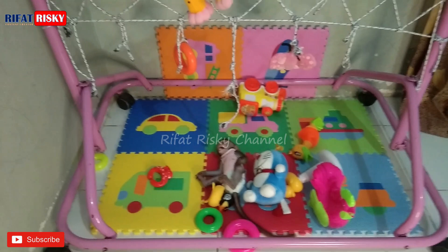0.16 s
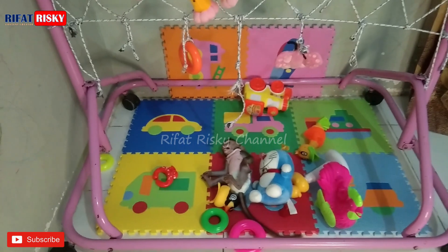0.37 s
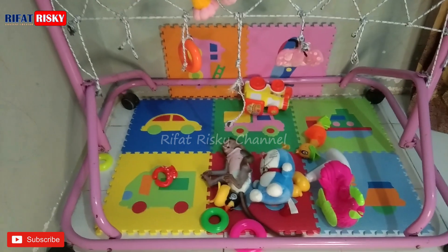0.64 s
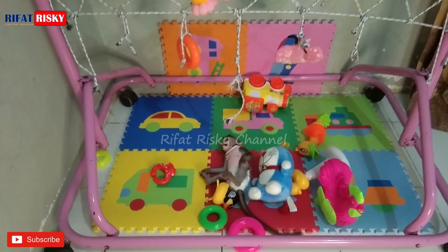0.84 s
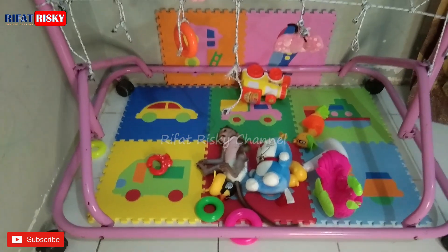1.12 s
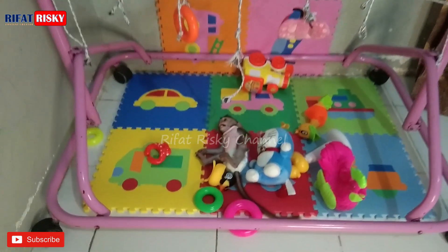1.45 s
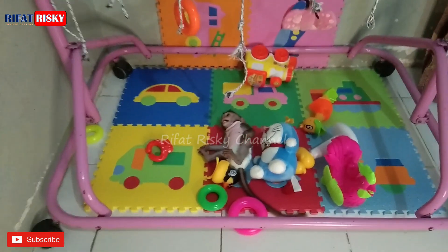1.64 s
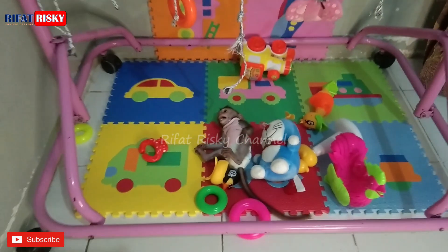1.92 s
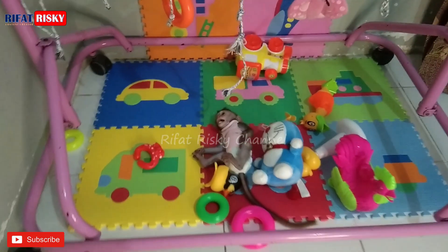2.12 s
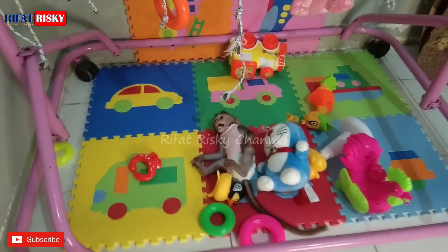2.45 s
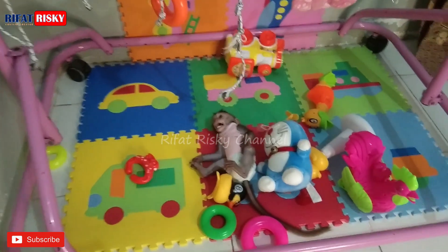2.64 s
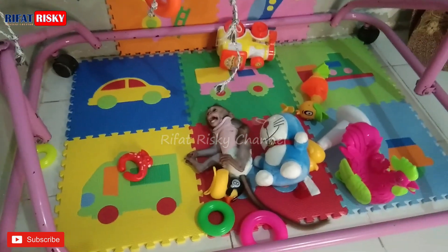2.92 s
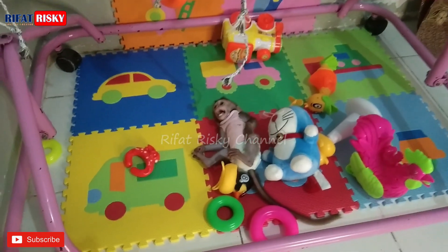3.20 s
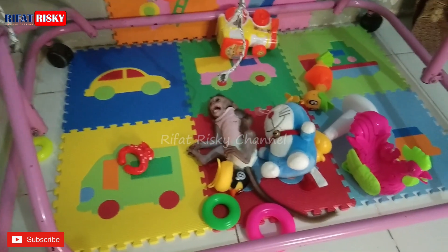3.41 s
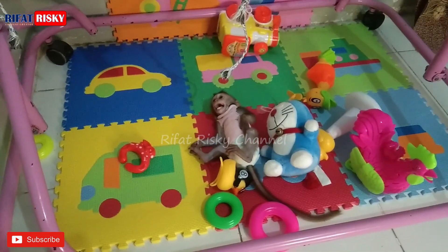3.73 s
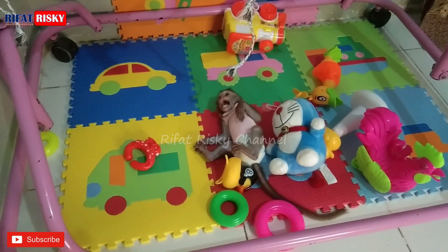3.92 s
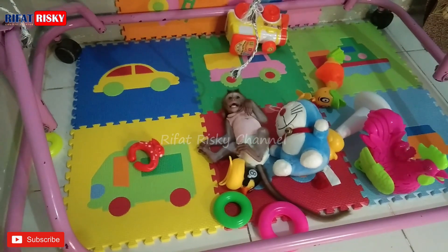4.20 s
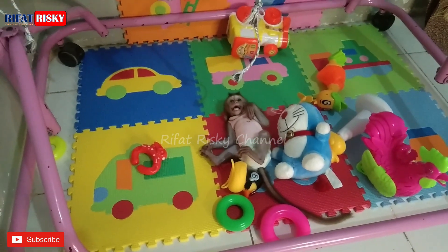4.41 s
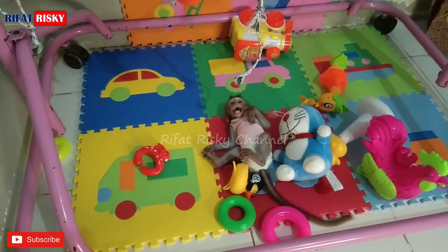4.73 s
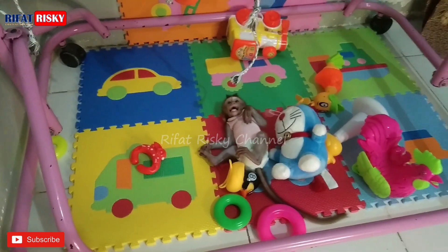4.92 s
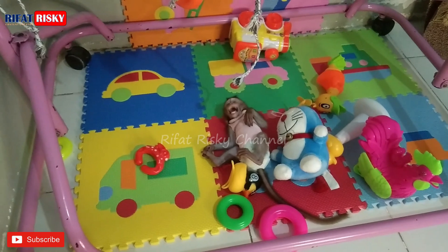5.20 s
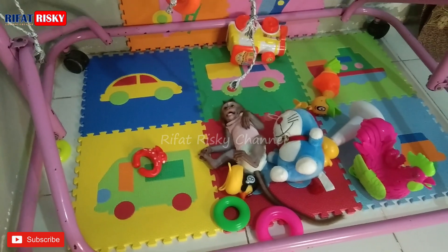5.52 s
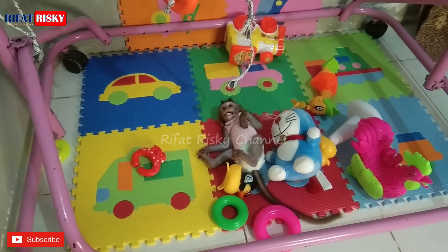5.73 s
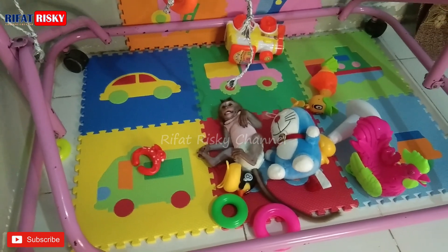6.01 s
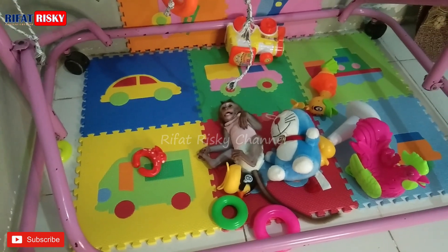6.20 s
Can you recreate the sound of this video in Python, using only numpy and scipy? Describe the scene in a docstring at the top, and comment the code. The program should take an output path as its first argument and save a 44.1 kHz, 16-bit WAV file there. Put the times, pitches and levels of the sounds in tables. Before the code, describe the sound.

A low, slightly beating motor hum and a soft rush of air run throughout in a reflective tiled room. At about 0.1 s a baby monkey gives one short shrill cry, a held note stepping up and breaking roughly, over by 0.27 s. Soft husky squeaks appear near 0.7, 1.2, 1.4, 1.7 and 1.9 s, with faint toy nudges on a foam mat at 1.2 and 1.7 s. Six very loud calls start at about 2.3, 2.7, 3.2, 3.7, 4.4 and 5.0 s. Each begins as a clear squeal whipping upward and thinning, then bursts into a harsh, fluttering, falling scream, with some broken into several pieces; faint low whines fall between and around them. The microphone's level ducks under the screams and slowly recovers. Screaming stops near 5.25 s. A faint rustle comes at 5.7 s, with click-and-thud toy bumps at 5.8 and 6.2 s.

```python
"""Throughout, motor lines beat over a rush of air in a tiled room. A baby monkey gives one shrill cry.
Soft squeaks and nudged toys follow: unsteady tones, and decaying noise bursts.
Then come six calls: harmonics sweep up in a clear squeal and thin out, then a stack of lines
one flutter rate apart falls as a harsh scream, and the recorder's gain ducks under the loud sounds.
A faint rustle and two more nudged toys close the scene."""
import sys
import numpy as np
from scipy import signal
from scipy.fft import rfft, irfft, next_fast_len
from scipy.io import wavfile
from scipy.ndimage import uniform_filter1d, minimum_filter1d, map_coordinates

SR = 44100
rng = np.random.default_rng(int(sys.argv[2]) if len(sys.argv) > 2 else 0)


def output_pcm(signal):
    """Save a mono or channel-first signal as 16-bit PCM at the path in sys.argv[1].

    Samples are clipped to [-1, 1] before scaling.
    """
    pcm = np.clip(np.atleast_2d(signal).T, -1, 1) * 32767
    wavfile.write(sys.argv[1], SR, np.round(pcm).astype(np.int16))


N = 280035
TIME = np.arange(N) / SR  # s
TOP_HZ = 15700


def amp(db):
    """Logarithmic level: decibels to an amplitude ratio."""
    return 10 ** (np.asarray(db) / 20)


def unit(x):
    """Power normalization: scales a signal to rms 1."""
    return x / np.sqrt(np.mean(x ** 2) + 1e-20)


def along(points, hz):
    """Spectral envelope: (f/Hz, value) points interpolated on a logarithmic frequency axis."""
    f, value = np.transpose(points)
    return np.interp(np.log(hz + 1), np.log(f + 1), value)


def curves(rows, t):
    """Temporal envelopes: each column after the time, interpolated at the times t."""
    knot_times, *columns = np.transpose(rows)
    return [np.interp(t, knot_times, column) for column in columns]


def wobble(rate, t):
    """Band-limited random modulation: a smooth curve through `rate` random knots a second."""
    knots = (t - t[0]) * rate
    return map_coordinates(rng.standard_normal(int(knots[-1]) + 4), [knots + 1])


def filtered(x, gain):
    """Linear filtering: the spectrum of x times a gain that depends on frequency."""
    m = next_fast_len(N + 8192)
    return irfft(rfft(x, m) * gain(np.fft.rfftfreq(m, 1 / SR)), m)[:N]


def noise(spectrum):
    """Coloured noise: white noise shaped by a spectral envelope, scaled to rms 1."""
    return unit(filtered(rng.standard_normal(N), lambda hz: amp(along(spectrum, hz))))


def cycles(hz):
    """Instantaneous phase: the running integral of a frequency curve, in radians."""
    return 2 * np.pi * np.cumsum(hz) / SR


def voiced(start, end, edge=.003):
    """Gating: sample indices, times and a soft-edged window (edge in s) for one utterance."""
    at = np.arange(int((start - edge / 2) * SR), int((end + edge / 2) * SR))
    t = at / SR
    return at, t, np.clip(np.minimum(t - t[0], t[-1] - t) / edge, 0, 1)


# motor lines, of which close pairs beat: (f/Hz, relative level/dB)
MOTOR_LINES = [(145, -67.5), (187, -62.5), (191, -56.5), (312, -64), (375.6, -55.5), (379, -76),
               (610, -58.5), (682, -61), (781, -60)]
# spectrum of the rush of air: (f/Hz, relative density/dB)
AIR_SPECTRUM = [(15, -59), (25, -28), (64, -19.5), (149, -10), (184, -6.5), (274, -9.5), (300, -8.5),
                (371, -5), (458, -7.5), (863, -7.5), (971, -11.5), (2480, -14.5), (3530, -24.5),
                (6340, -20.5), (6800, -27), (8840, -66.5), (15000, -120)]
# slow drift, of which only the departure from the mean counts: (t/s, hum level/dB, air level/dB)
BACKGROUND_DRIFT = [(0.0, -57, -47), (1.98, -56, -47), (2.88, -58, -43.5), (3.64, -61.5, -51),
                    (3.86, -59, -44.5), (5.04, -63.5, -46.5), (5.27, -64.5, -50.5), (6.07, -58, -48),
                    (6.35, -69, -43.5)]


def background(hum_db=-52.0, air_db=-44.0, waver_db=4.0, drift=0.87):
    """Beating: neighbouring motor lines interfere, each wavering, over a drifting broadband rush of air."""
    hum_level, air_level = (level - level.mean() for level in curves(BACKGROUND_DRIFT, TIME))
    hum = np.zeros(N)
    for hz, db in MOTOR_LINES:
        strength = amp(db + waver_db * wobble(4.5, TIME))
        hum += strength * np.sin(2 * np.pi * hz * TIME + drift * wobble(6, TIME))
    return amp(hum_db + hum_level) * unit(hum) + amp(air_db + air_level) * noise(AIR_SPECTRUM)


# reverberation time of the tiled room: (f/Hz, t60/s)
REVERBERATION = [(300, 0.22), (2000, 0.95), (4500, 0.64), (7000, 0.67), (14000, 0.85)]


def room(x, gap=.002, early_db=2, early_t60=0.039):
    """Reverberation: quick dense echoes off floor and near walls, then a ring whose decay varies with f."""
    hz, t, z = signal.stft(rng.standard_normal(SR), SR, nperseg=256)
    fade = amp(-60 * t / along(REVERBERATION, hz)[:, None]) + amp(early_db - 60 * t / early_t60)
    tail = signal.istft(z * fade, SR, nperseg=256)[1]
    tail = np.pad(tail / np.linalg.norm(tail), (int(gap * SR), 0))  # unit energy, after a gap in s
    return signal.fftconvolve(x, tail)[:N]


# toys nudged: (t/s, relative level/dB, further level of the thud/dB)
NUDGES = [(1.225, -43.5, -4), (1.7, -42.5, -19), (5.771, -37.5, -4.5), (6.232, -33, -2.5)]
# spectrum of the contact: (f/Hz, relative density/dB)
TAP_SPECTRUM = [(500, -12), (1300, 17.5), (3000, 6), (5500, 18), (12000, -21)]
# spectrum of the dull thud: (f/Hz, relative density/dB)
THUD_SPECTRUM = [(120, -63), (350, 18), (700, 4.5), (1500, -27)]


def bumps(t60=0.67, tap_db=-8, thud_db=-8, click_db=3, click_t60=0.052):
    """Impact decay: toys nudged on a foam mat give click and scuff over a thud, fading at two rates (s)."""
    out, tap, thud = np.zeros(N), noise(TAP_SPECTRUM), noise(THUD_SPECTRUM)
    for start, db, low_db in NUDGES:
        age = abs(TIME - start)
        decay = amp(-60 * age / t60) + amp(click_db - 60 * age / click_t60)
        fade = (TIME >= start) * amp(db) * decay
        out += fade * (amp(tap_db) * tap + amp(thud_db + low_db) * thud)
    return out


# faint low whines: (t/s, length/s, first f/Hz, last f/Hz, relative level/dB)
LOW_WHINES = [(2.76, 0.14, 850, 788, -45.5), (3.31, 0.064, 900, 796, -48.5),
              (3.717, 0.059, 1330, 1340, -44), (3.85, .2, 898, 656, -44), (4.58, .09, 847, 732, -44),
              (5.1, 0.1, 828, 765, -44.5)]
# soft squeaks, and a faint rustle at the end: (t/s, length/s, mean f/Hz, relative level/dB, roughness from 0 up)
SQUEAKS_AND_RUSTLE = [(0.678, 0.15, 4450, -50, 0.83), (1.226, 0.095, 5290, -51.5, 0.24),
                      (1.398, 0.052, 4450, -48, 0.74), (1.7, .04, 5300, -57, 0.55),
                      (1.882, 0.073, 4520, -44, 1.04), (2.322, 0.032, 4300, -24.5, 0.88),
                      (5.72, 0.087, 2447, -51, 1.26)]
# spectrum of husky noise, also used in the squeals: (f/Hz, relative density/dB)
RASP_SPECTRUM = [(200, -70), (1200, -21.5), (2900, -14.5), (4000, -13), (6500, -16.5), (10000, -15.5),
                 (15000, -25)]


def whimpers(whine_jitter=0.06, squeak_jitter=0.0824, rasp_db=-4):
    """Random frequency modulation: unsteady low whines, and squeaks and a rustle, husky with noise."""
    out, rasp = np.zeros(N), noise(RASP_SPECTRUM)
    for start, length, first_hz, last_hz, db in LOW_WHINES:
        at, t, gate = voiced(start, start + length, edge=0.015)
        pitch = np.linspace(first_hz, last_hz, len(t))
        tone = np.sqrt(2) * np.sin(cycles(pitch * (1 + whine_jitter * wobble(250, t))))
        out[at] += gate * amp(db) * tone
    for start, length, pitch, db, rough in SQUEAKS_AND_RUSTLE:
        at, t, gate = voiced(start, start + length, edge=0.024)
        tone = np.sqrt(2) * np.sin(cycles(pitch * (1 + squeak_jitter * rough * wobble(1400, t))))
        out[at] += gate * amp(db) * (tone + amp(rasp_db) * rough * rasp[at])
    return out


# opening cry, a held note that steps up into a rough arch: (t/s, f/Hz, relative level/dB, roughness)
OPENING_CRY = [(.111, 1802, -24.5, .15), (0.125, 2030, -21, 0.01), (.178, 2040, -32, 0.14),
               (.192, 2162, -16, 0), (.207, 2135, -34, 0.13), (.219, 2230, -19.5, 0.26),
               (.228, 3000, -18.5, 0.21), (.24, 2727, -15, 0.1), (.25, 2217, -14.5, 0.22),
               (.264, 1697, -22.5, 0.75)]
# rising squeals: (t/s, hold/s, sweep/s, thin tail/s, held f/Hz, top f/Hz, last f/Hz,
# relative held level/dB, relative top level/dB, roughness, weight of the fundamental at the top/dB)
RISING_SQUEALS = [ (2.331, 0.017, .012, 0.012, 1964, 4200, 5300, -23.5, -19.5, .35, -1),
                  (2.703, .012, .028, 0.061, 2297, 5680, 6800, -22, -16.5, 0.07, -8),
                  (3.201, .022, .019, 0.06, 2241, 4546, 5140, -20.5, -14, 0.27, -2),
                  (3.733, 0.02, .032, 0.0034, 2198, 5820, 6530, -24, -13, 0.18, -1),
                  (4.41, .044, .015, .034, 1979, 3520, 3675, -25, -14.5, 0.17, 5),
                  (5.003, 0.03, .016, 0.067, 2227, 3575, 7460, -25, -14, 0.2, -4)]


def squeal_shapes():
    """Glissando: the cry, then squeals that scoop to a note, hold, sweep up as they swell, and thin out."""
    held_fundamental_db = -4.5  # weight of the fundamental while a note is held
    scoop_depth, scoop_s = 0.215, 0.00854  # share below the note at the start, time constant of the slide
    sweep_curve = 1.8  # the upward sweep speeds up with this power of time
    # past the top the level drops over thin_s, fades on along the tail, and roughness nears thin_rough
    thin_db, thin_s, fade_db, thin_rough = 11.5, 0.011, 5, .7
    at, t, gate = voiced(OPENING_CRY[0][0], OPENING_CRY[-1][0])
    yield at, t, gate, *curves(OPENING_CRY, t), held_fundamental_db
    for (start, hold, sweep, tail, held_hz, top_hz, last_hz,
         held_db, top_db, rough, full_db) in RISING_SQUEALS:
        top = start + hold + sweep
        at, t, gate = voiced(start, top + tail)
        scoop = 1 - scoop_depth * np.exp(-(t - start) / scoop_s)
        climb = np.clip((t - start - hold) / sweep, 0, 1) ** sweep_curve
        thin = np.clip((t - top) / thin_s, 0, 1)
        fade = np.clip((t - top) / tail, 0, 1)
        pitch = held_hz * scoop * (top_hz / held_hz) ** climb * (last_hz / top_hz) ** np.sqrt(fade)
        db = held_db + (top_db - held_db) * climb - thin_db * thin - fade_db * fade
        roughness = rough + (thin_rough - rough) * thin
        fundamental_db = held_fundamental_db * (1 - climb) + full_db * climb
        yield at, t, gate, pitch, db, roughness, fundamental_db


# pass band of the throat, shared by squeals and screams: (f/Hz, relative gain/dB)
THROAT_BAND = [(1500, -21), (2100, -10), (2900, -11), (3600, -5.5), (4400, 2), (5300, 3.5), (6300, 0),
               (7100, -4), (10000, -10.5), (15000, -18.5)]


def squeals(jitter=0.07, shimmer_db=6, slope_db=-2, rasp_db=-10, doubling_db=-10, flicker_db=4.0):
    """Source and filter: harmonics sweep through the throat's pass band; roughness doubles the period."""
    out, rasp = np.zeros(N), noise(RASP_SPECTRUM)
    k = np.arange(2, 17)[:, None] / 2  # harmonic numbers 1 to 8 in half steps
    for at, t, gate, pitch, db, rough, full_db in squeal_shapes():
        pitch = pitch * (1 + jitter * rough * wobble(900, t) + 0.0063 * wobble(149.4, t))
        size_db = along(THROAT_BAND, k * pitch) + slope_db * np.log2(k) + full_db * (k == 1)
        size = amp(size_db) * (k * pitch < TOP_HZ)
        size = size * np.where(k % 1, amp(doubling_db) * rough, 1)  # lines halfway between harmonics
        flicker = amp(flicker_db * np.array([wobble(161.7, t) for _ in k]))
        tone = (size * flicker * np.sin(k * cycles(pitch))).sum(0)
        tone = tone / np.sqrt((size ** 2).sum(0) / 2)
        level = amp(db + shimmer_db * rough * wobble(504.4, t))
        out[at] += gate * level * (tone + amp(rasp_db) * rough * rasp[at])
    return out


# falling screams: (t/s, rise/s, sag/s, first f/Hz, last f/Hz, power of time of the fall,
# relative peak level/dB, sag/dB, first roughness, torn roughness, flutter rate over pitch)
FALLING_SCREAMS = [ (2.397, .021, .022, 5600, 2655, 1.44, -6.5, 6.5, 0.3, 0.71, 0.21),
                   (2.854, 0.0071, 0.05, 4470, 4410, 1.07, -25, 4, 0.4, 0.65, 0.19),
                   (2.905, 0.024, .032, 4048, 3024, 1.2, -8.5, 10.5, 0.57, 0.8, .21),
                   (3.357, .016, .070, 4380, 2495, 1.35, -8, 14.5, .6, 1.07, .2),
                   (3.921, 0.025, 0.0168, 4626, 4156, 1.2, -7, 12, .25, 0.81, .2),
                   (3.962, 0.012, 0.046, 3930, 3826, 0.97, -20, 1, .6, 0.32, .2),
                   (4.049, .004, 0.0181, 3880, 3150, 1.085, -10.5, 15, 0.53, 1.2, .2),
                   (4.523, 0.0064, 0.0485, 4470, 4394, 1.1, -11, 12.5, 1.04, 1, .2),
                   (4.663, 0.022, .046, 4493, 3040, 1.3, -9.5, 8.5, 0.65, .9, .2),
                   (5.139, 0.03, .082, 4458, 3300, 2.2, -11.5, 6.5, 0.32, 0.97, 0.18)]


def scream_shapes():
    """Envelope and glide: each scream swells and sags as its pitch falls and its roughness shifts."""
    rise_db = 18  # swell of a smooth start to its peak
    rough_start_db = 15.5  # a start of roughness 1 is this much louder, and so more abrupt
    tear_s = 0.049  # time until the torn roughness is reached
    for (start, rise, sag, first_hz, last_hz, bend, peak_db, sag_db,
         first_rough, torn_rough, flutter_ratio) in FALLING_SCREAMS:
        at, t, gate = voiced(start, start + rise + sag)
        age = np.maximum(t - start, 0)
        pitch = first_hz + (last_hz - first_hz) * (age / (rise + sag)) ** bend
        start_drop_db = rise_db - rough_start_db * first_rough
        db = peak_db - np.interp(age, [0, rise, rise + sag], [start_drop_db, 0, sag_db])
        roughness = np.interp(age, [0, tear_s], [first_rough, torn_rough])
        yield at, t, gate, pitch, db, roughness, flutter_ratio


# lines of a scream, from its pitch upwards, one flutter rate apart: relative level/dB
FLUTTER_LINES = [-0.5, 1, 0, 0, -2.5, -3, -12.5]
# spectrum of the turbulence that rides on the pitch: (f above the pitch/Hz, relative density/dB)
TURBULENCE_SPECTRUM = [(60, -38), (500, 12.5), (2500, -3), (3600, -20), (7000, -9), (9000, -42)]
# spectrum of the broad rush under a scream: (f/Hz, relative density/dB)
SKIRT_SPECTRUM = [(200, -56), (800, -18), (1600, -10), (2400, -11), (3200, -2), (4500, -8.5), (7000, 4.5),
                  (12000, -7)]


def screams(jitter=0.022, flutter_jitter=0.1206, tear=0.97, shimmer_db=4.0, rasp_db=-11,
            skirt_db=-14, second_db=-13, third_db=-20):
    """Biphonation: a flutter stacks lines above a whistle-high pitch; strain tears them into chaos."""
    out, turbulence = np.zeros(N), signal.hilbert(noise(TURBULENCE_SPECTRUM))
    skirt = noise(SKIRT_SPECTRUM)
    line_db = np.array(FLUTTER_LINES)[:, None]
    step = np.arange(len(FLUTTER_LINES))[:, None]
    for at, t, gate, pitch, db, rough, flutter_ratio in scream_shapes():
        whistle = cycles(pitch * (1 + jitter * rough * wobble(1121, t)))
        flutter = cycles(pitch * flutter_ratio * (1 + flutter_jitter * rough * wobble(509.2, t)))
        # the lowest line is not torn, so the scream keeps a sharp falling edge
        torn = tear * rough * np.sqrt(step) * np.array([wobble(598.3, t) for _ in step])
        phase = whistle + step * flutter + torn
        # one line leads in smooth moments, the rest grow with roughness; the throat weights them all
        size = amp(line_db + along(THROAT_BAND, pitch * (1 + step * flutter_ratio)))
        size = size * np.where(step == 1, 1, np.sqrt(abs(rough)))
        lines = np.sin(phase) + amp(second_db) * np.sin(phase + whistle)
        lines = lines + amp(third_db) * np.sin(phase + 2 * whistle)
        tone = (size * lines).sum(0) / np.sqrt((size ** 2).sum(0) / 2)
        # single-sideband shift: the turbulence rides on the pitch
        hiss = amp(rasp_db) * rough * np.real(turbulence[at] * np.exp(1j * whistle))
        hiss = hiss + amp(skirt_db) * rough * skirt[at]
        level = amp(db + shimmer_db * rough * wobble(482.5, t))
        out[at] += gate * level * (tone + hiss)
    return out


def scene(direct_db=-2.0, room_db=0):
    """Superposition: monkey and toys heard directly and through the room, added to the background."""
    near = squeals() + screams() + whimpers() + bumps()
    return (amp(direct_db) * near + amp(room_db) * room(near) + background())[None]


RECORDING_RESPONSE = [(6700, 0), (7250, -10), (7600, -30.5), (7950, -40.5), (8500, -29.5), (10800, -27),
                      (11800, -52.5), (13000, -28), (15000, -37)]


def record(dry, threshold_db=-19, squeeze=0.25, release=0.52):
    """Dynamic compression: a band-limited recording chain, slowly recovering gain and a peak limiter."""
    x = filtered(dry[0], lambda hz: amp(along(RECORDING_RESPONSE, hz)))
    loudness = np.sqrt(abs(uniform_filter1d(x ** 2, size=441)))  # rms over 10 ms
    # peaks are held and decay with the release time constant in s
    held = np.maximum.accumulate(loudness * np.exp(TIME / release)) * np.exp(-TIME / release)
    x = x * np.maximum(held / amp(threshold_db), 1) ** -squeeze
    needed = 1 / np.maximum(abs(x) / .8, 1)  # gain that keeps peaks within 0.8
    x = x * uniform_filter1d(minimum_filter1d(needed, size=221), size=221)
    return filtered(x, lambda hz: hz < TOP_HZ)[None]


dry = scene()
out = record(dry)
output_pcm(out)
```